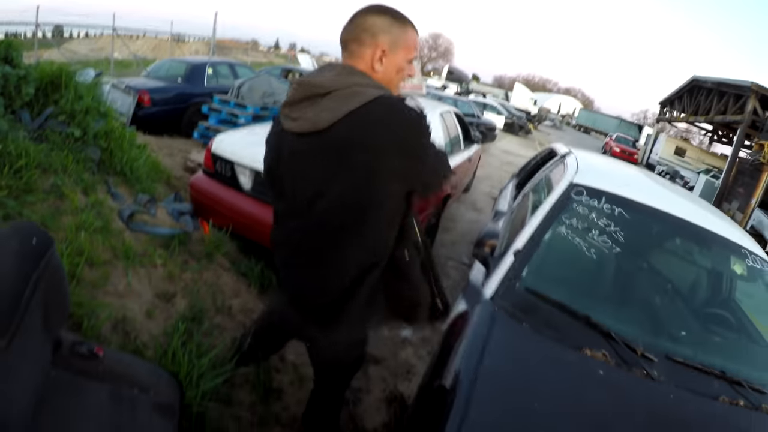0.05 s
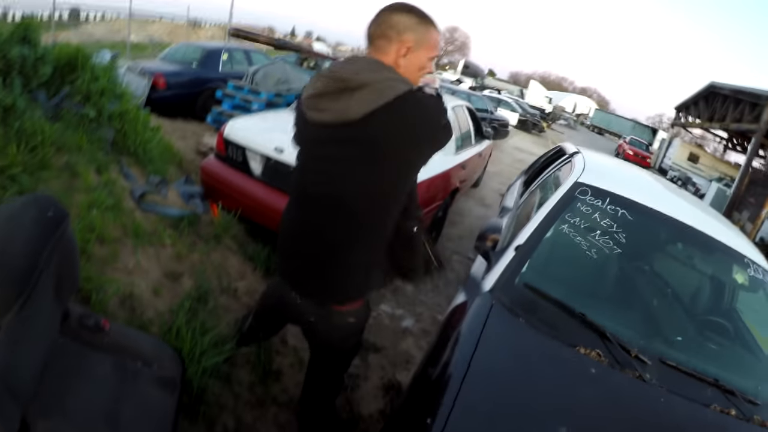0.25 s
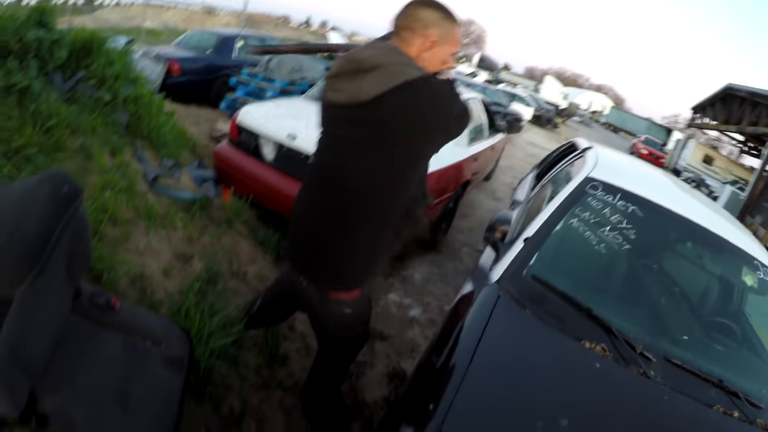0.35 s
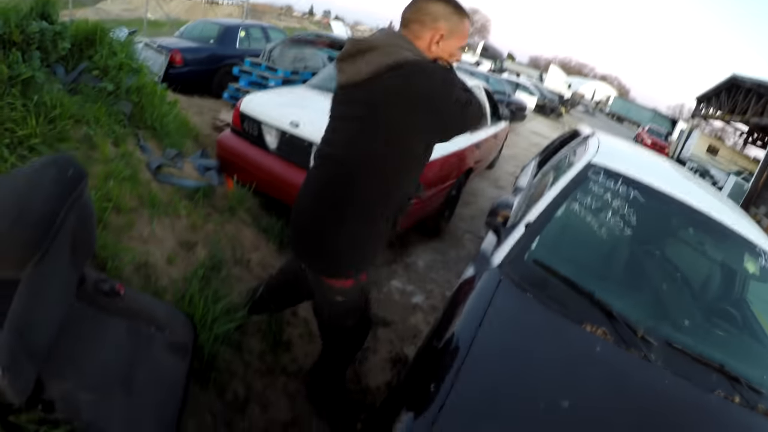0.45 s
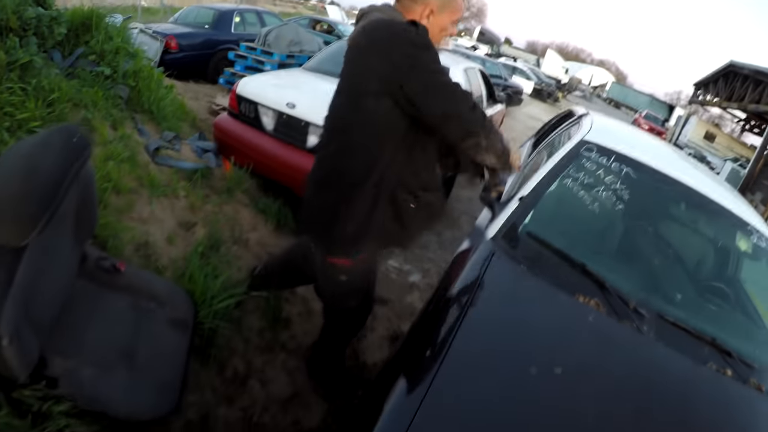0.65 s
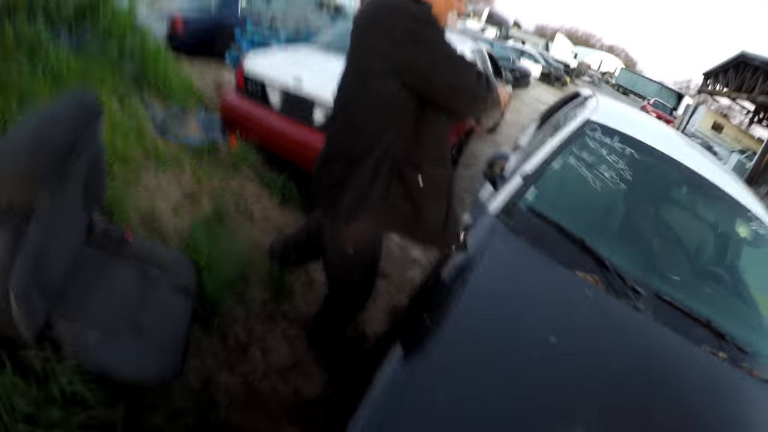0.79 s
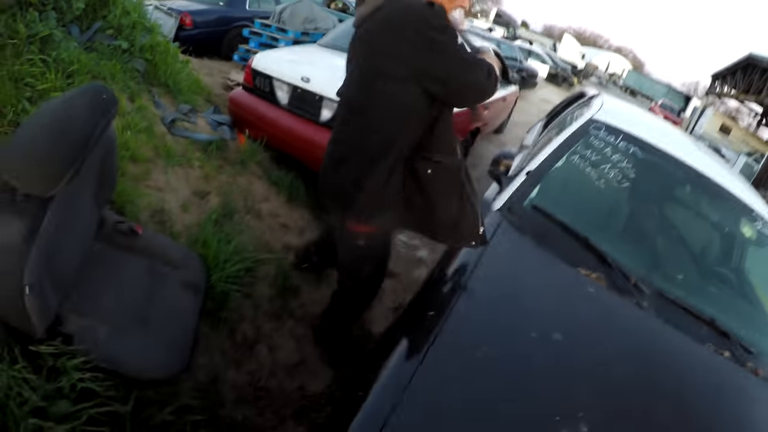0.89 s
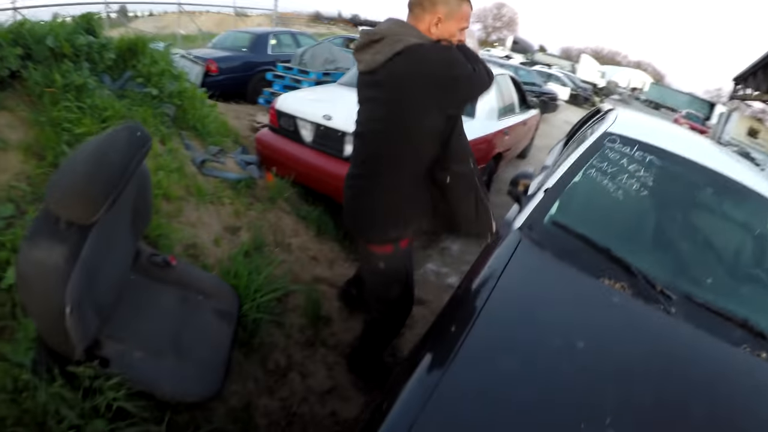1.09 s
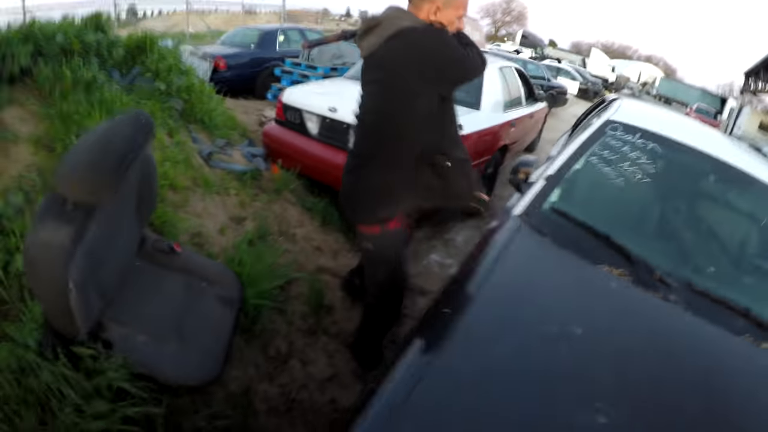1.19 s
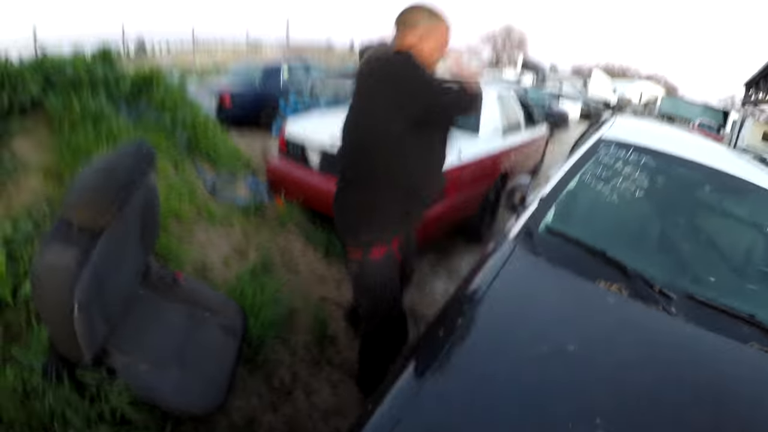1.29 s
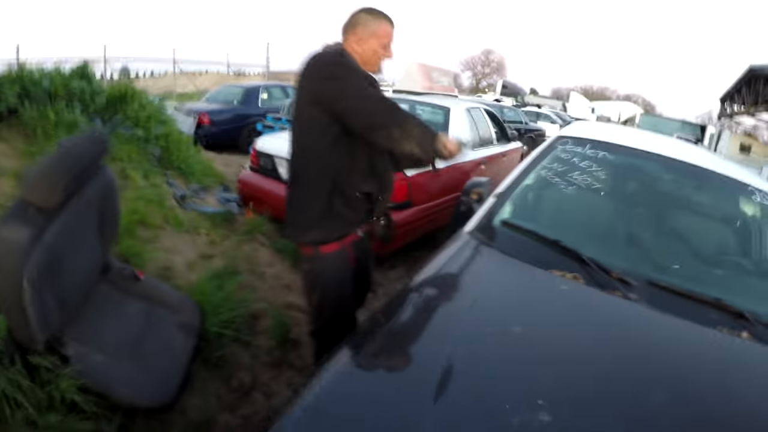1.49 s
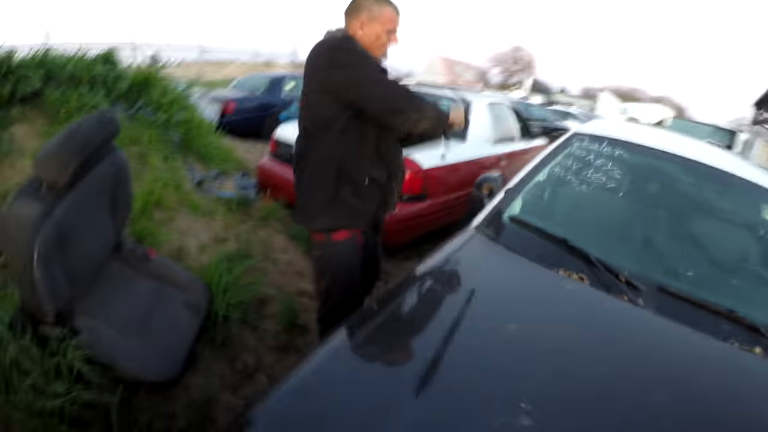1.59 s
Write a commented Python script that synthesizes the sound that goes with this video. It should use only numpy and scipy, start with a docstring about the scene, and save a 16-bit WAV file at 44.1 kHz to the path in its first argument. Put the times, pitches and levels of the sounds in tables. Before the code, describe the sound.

A hard baton strikes a car's side window twice, each sharp crack ringing briefly over a dull door thump. A jacket swishes faintly before each blow, and wind buffets the microphone in an open yard.

```python
"""Baton on a car window

Open yard, a small microphone out in the wind. A hard baton strikes a car's side window twice, the
jacket swishing on each wind-up. The pane cracks and rings briefly, the door thumps, and parked cars
scatter the crack back. Gusts buffet the microphone throughout, and the blows overload it."""
import sys
import numpy as np
from scipy import signal
from scipy.fft import rfft, irfft
from scipy.io import wavfile
from scipy.ndimage import uniform_filter1d

SR = 44100
rng = np.random.default_rng(int(sys.argv[2]) if len(sys.argv) > 2 else 0)


def put_to_file(sound):
    """Save the sound as 16-bit audio at rate SR, in the file named by the first command-line argument."""
    columns = np.atleast_2d(sound).T  # one column per channel
    safe = np.clip(columns, -1, 1)
    whole_steps = np.round(safe * 32767)
    wavfile.write(sys.argv[1], SR, whole_steps.astype(np.int16))


N = 72765

# The two blows. Each row: start in seconds, crack in dB, chatter length in seconds, door thump in dB,
# door pitch factor, cabin boom in dB, tick in dB, tick delay in seconds, echo in dB, door rebound in dB.
BATON_BLOWS = [(0.5668, -10.5, 0.0069, -11.5, .9, -3, -10, 0.0011, -41, -19),
               (1.343, -8.5, 0.0038, -3.5, 1.1, -15, -13, 0.0036, -44.5, -9)]
# Modes of pane, door and cabin air. Each row: frequency in Hz, relative level in dB, T60 in seconds.
PANE_MODES = [(470, -2.5, .05), (711, -8, 0.07), (973, -7.5, .05), (1276, -5.5, 0.051), (2230, -5.5, 0.015),
              (2420, -8.5, 0.027), (2835, -0.5, .045), (3104, -0.5, .045), (3383, 4.5, 0.05),
              (3504, -5, 0.074), (4130, -5.5, 0.045), (4680, -11, 0.038), (5460, -16.5, .05)]
DOOR_MODES = [(121.7, -1.5, 0.096), (152.4, -3, 0.076), (191.6, -6.5, .1), (255.2, -8, 0.061)]
CABIN_MODES = [(57.4, 0.5, 0.1)]
# Dense ring of pane and baton, and the yard's reverberation.
# Each row: band centre in Hz, relative level in dB, T60 in seconds.
CRACK_BANDS = [(325, -8.5, 0.023), (591, -3, .08), (932, -12.5, 0.13), (1458, -8.5, 0.088),
               (2226, -9, 0.051), (2790, 0, 0.077), (4480, -6, 0.091), (5560, -15.5, 0.063),
               (8640, -24.5, 0.1), (13500, -26, 0.063)]
YARD_BANDS = [(1200, -53.5, 0.77), (1970, -51, 0.79), (2700, -51, 0.92), (3850, -52, 0.83),
              (5023, -54.5, 0.49), (7700, -69.5, 1.2), (11500, -74.5, .5)]
# Gusts before, between and after the blows. Each row: time in seconds, rumble in dB, flutter in dB.
GUSTS = [
    [(0.0, -15, -65), (0.038, -29.5, -29.5), (0.1, -35, -100), (0.13, -38, -45.5), (0.154, -38, -55),
     (0.194, -41.5, -63), (0.206, -30.5, -56), (0.22, -26.5, -38), (0.246, -17.5, -37.5), (0.268, -22, -46),
     (0.286, -22, -34.5), (0.332, -30.5, -29), (0.366, -16.5, -21.5), (0.394, -30, -26.5),
     (0.412, -29.5, -24.5), (0.44, -26, -40.5), (0.484, -28.5, -38.5), (0.51, -16.5, -30),
     (0.536, -25, -41.5), (0.552, -10.5, -28.5)],
    [(0.625, -26.5, -35), (0.655, -25.5, -37), (0.693, -39, -44), (0.733, -27, -37), (0.773, -38, -37),
     (0.795, -30.5, -28.5), (0.849, -19.5, -32.5), (0.899, -34.5, -42.5), (0.961, -26.5, -21.5),
     (0.991, -16.5, -37), (1.035, -42, -67), (1.055, -24, -52), (1.073, -33, -59), (1.113, -41, -54),
     (1.155, -26, -42.5), (1.185, -24.5, -60), (1.203, -26.5, -28), (1.277, -15, -44), (1.299, -27, -49),
     (1.318, -44, -40)],
    [(1.4, -23.5, -26.5), (1.424, -32.5, -45), (1.442, -23.5, -31.5), (1.462, -39, -39), (1.484, -16, -45),
     (1.498, -30.5, -31), (1.518, -22.5, -52), (1.536, -31.5, -31), (1.556, -28, -56), (1.574, -42, -52),
     (1.59, -40, -45), (1.604, -31.5, -35), (1.64, -25, -29.5)],
]
# Colour of the wind on the microphone. Each row: band centre in Hz, relative level in dB.
WIND_BANDS = [(22, -5.5), (40, -1), (75, -3.5), (130, -1), (220, -6), (380, -14.5), (650, -27),
              (1100, -42.5), (1800, -53)]
# Eddies hitting the microphone. Each row: time in seconds, peak in dB, width in ms, rough edge in dB.
EDDIES = [(0.035, -25.5, 1.46, -37), (0.218, -25.5, 1.14, -48.5), (0.316, -21.5, 1.4, -40),
          (0.355, -14.5, 1.37, -41), (0.387, -22, 0.72, -39), (0.4, -13.5, 1.76, -31),
          (0.508, -23.5, 1.35, -67), (0.717, -20.5, 1.5, -42), (0.789, -22, 1.37, -41),
          (0.815, -25, 0.67, -36), (0.834, -15, 1.43, -32), (0.86, -26, 0.88, -43),
          (0.885, -28, 1.1, -39.5), (0.926, -22, 0.71, -32), (0.953, -12.5, 2.2, -38),
          (0.957, -11.5, 2.1, -29.5), (0.965, -19, 0.78, -36.5), (0.977, -29, 0.62, -48),
          (1.207, -25, 1.57, -43), (1.236, -27.5, 0.7, -40.5), (1.267, -30, 1.6, -41.5),
          (1.482, -31.5, 0.84, -44.5), (1.52, -22, 1.63, -46.5), (1.607, -24, 1.8, -53),
          (1.632, -28.5, 0.69, -35)]
# Jacket movements. Each row: peak time in seconds, level in dB, rise and fall in seconds.
JACKET_SWISHES = [(0.404, -46.5, 0.034, 0.022), (0.472, -66.5, 0.072, 0.13), (0.918, -65.5, 0.14, 0.14),
                  (1.116, -56, 0.033, 0.063), (1.301, -63.5, 0.057, 0.06)]
# Spectra of rubbing nylon and of the yard's air. Each row: frequency in Hz, relative density in dB.
NYLON_SPECTRUM = [(700, -23), (1400, 1), (2200, -1.5), (4500, -3), (6500, -7), (10000, -13.5), (14000, -18),
                  (15500, -32)]
AIR_SPECTRUM = [(150, -30), (250, -4), (450, -13), (499, -18), (768, -17.5), (2320, -34.5), (2530, -34),
                (10100, -53), (15500, -72.5)]


def window(u, crack_db, chatter_s):
    """The tip chatters on the glass, then pane and baton ring down; u is seconds since contact."""
    snap_db, snap_t60_s, pane_db = 4.5, .0067, -6
    released = np.clip(u - chatter_s, 0, None)  # the crack holds until the chatter ends
    grit = undb(2.5 * walk(600) * fade(released, .03))
    snap = undb(snap_db) * fade(released, snap_t60_s)
    crack = sum(undb(db) * noise_band(hz, .63) * (fade(released, t60) + snap)
                for hz, db, t60 in CRACK_BANDS)
    pane = sum((1 + .5 * walk(120)) * ring(u, [mode]) for mode in PANE_MODES)
    return attack(u) * (undb(crack_db - snap_db) * grit * crack + undb(crack_db + pane_db) * pane)


def tip_tick(u):
    """The hard tip ticks on the glass, high and very short."""
    return fade(u, t60=.004) * noise_band(11000, 1.4)


def door_thump(u, thump_db, pitch, boom_db, rebound_db):
    """The door thumps and rebounds, the cabin booms; the length of the push rounds them off."""
    rebound_s, push_s = .021, .0017
    thump = undb(thump_db) * ring(u - .002, DOOR_MODES, pitch)
    boom = undb(boom_db) * ring(u - .001, CABIN_MODES)
    rebound = undb(rebound_db) * ring(u - rebound_s, DOOR_MODES, pitch)
    return uniform_filter1d(thump + boom + rebound, int(push_s * SR))


def yard_reflections(u, echo_db):
    """Parked cars scatter the crack back: a diffuse tail and one short echo from farther off."""
    echo_s = .101
    tail = sum(undb(db + 1.3 * walk(30)) * steep_band(hz, .6) * fade(u, t60)
               for hz, db, t60 in YARD_BANDS)
    echo = uniform_filter1d(fade(u - echo_s, t60=.04), size=150) * steep_band(3200, .625)
    return attack(u) * tail + undb(echo_db) * echo


def baton_blows(t):
    """Each blow sets off glass and door, and the yard answers."""
    out = np.zeros(N)
    for blow in BATON_BLOWS:
        at, crack_db, chatter_s, thump_db, pitch, boom_db, tick_db, tick_s, echo_db, rebound_db = blow
        u = t - at
        out += window(u, crack_db, chatter_s)
        out += undb(tick_db) * tip_tick(u - tick_s)
        out += door_thump(u, thump_db, pitch, boom_db, rebound_db)
        out += yard_reflections(u, echo_db)
    return out


def wind_buffet(t):
    """Turbulence right on the microphone: the deep bands roll, the upper ones flutter together."""
    split_hz = 119.7
    times, rumble, flutter = np.concatenate(GUSTS).T
    rumble_db, flutter_db = np.interp(t, times, rumble), np.interp(t, times, flutter)
    flicker = walk(47)
    out = np.zeros(N)
    for hz, db in WIND_BANDS:
        upper = np.clip(np.log2(hz / split_hz) + .5, 0, 1)  # rumble gives way to flutter over an octave
        gust_db = (1 - upper) * rumble_db + upper * flutter_db
        flicker_db = -(.155 * upper + .25 * max(np.log2(hz / 200), 0)) * flicker
        out += undb(db + gust_db + flicker_db + 1.7 * walk(15)) * steep_band(hz, 1.09)
    return out


def eddy_pops(t):
    """Each eddy pops on the microphone: one pressure pulse with a short rough edge."""
    lag_s, edge_s = .003, .0018
    edge = steep_band(555, 1.5)
    out = np.zeros(N)
    for at, db, width_ms, edge_db in EDDIES:
        u = (t - at - lag_s) * 1000 / width_ms
        out += undb(db) * (1 - u ** 2) * np.exp(-u ** 2 / 2)
        out += undb(edge_db) * np.exp(-((t - at - edge_s) / edge_s) ** 2) * edge
    return out


def jacket(t):
    """Nylon rubs on nylon: a grainy hiss that swells and stops."""
    swell = sum(undb(db) * np.exp(-((t - at) / np.where(t < at, rise, fall)) ** 2)
                for at, db, rise, fall in JACKET_SWISHES)
    grain = undb(1.2 * walk(370))
    return swell * grain * coloured(NYLON_SPECTRUM)


def yard_air(level_db=-58.5):
    """A faint, slowly drifting hush behind everything."""
    return undb(level_db + 2.7 * walk(2.7)) * coloured(AIR_SPECTRUM)


def undb(db):
    return 10 ** (np.asarray(db) / 20)


def unit(x):
    return x / np.sqrt(np.mean(x ** 2))


def band(x, hz, octaves):
    """Band-pass centred on hz."""
    edges = np.clip([hz * 2 ** (-octaves / 2), hz * 2 ** (octaves / 2)], 5, .45 * SR)
    return signal.sosfilt(signal.butter(2, edges, "bandpass", fs=SR, output="sos"), x)


def noise_band(hz, octaves):
    """Band of noise, rms 1."""
    return unit(band(rng.standard_normal(N), hz, octaves))


def steep_band(hz, octaves):
    """Band of noise filtered twice, rms 1."""
    return unit(band(noise_band(hz, octaves), hz, octaves))


def coloured(spectrum):
    """Noise of rms 1 with the given spectrum."""
    hz, db = np.array(spectrum).T
    bins_hz = np.arange(N // 2 + 1) * SR / N + 1
    gain = undb(np.interp(np.log(bins_hz), np.log(hz), db, left=-90))
    return unit(irfft(rfft(rng.standard_normal(N)) * gain, N))


def walk(rate):
    """Random levels held 1 / rate seconds and slewed twice."""
    hold = int(SR / rate)
    steps = np.repeat(rng.standard_normal(N // hold + 1), hold)
    return 1.52 * uniform_filter1d(uniform_filter1d(steps, hold), hold)[:N]


def attack(t, rise_s=.0007):
    """Linear rise from the moment of contact."""
    return np.clip(t / rise_s, 0, 1)


def fade(t, t60):
    """Silent before t = 0, then falling 60 dB in t60 seconds."""
    return (t >= 0) * np.exp(-np.log(1000) * np.clip(t, 0, None) / t60)


def ring(t, modes, pitch=1):
    """Sum of decaying sines."""
    return sum(undb(db) * fade(t, t60) * np.sin(2 * np.pi * hz * pitch * t) for hz, db, t60 in modes)


def scene():
    """Everything that reaches the one microphone."""
    t = np.arange(N) / SR
    return (yard_air() + eddy_pops(t) + wind_buffet(t) + baton_blows(t) + jacket(t))[None]


def record(dry):
    """The microphone overloads: the loudest peaks flatten against full scale; the top is cut."""
    drive, top_hz = 1.156, 15600
    driven = drive * dry
    clipped = driven / (1 + np.abs(driven) ** 6) ** (1 / 6)
    return signal.sosfilt(signal.ellip(10, .2, 75, top_hz, fs=SR, output="sos"), clipped)


dry = scene()
out = record(dry)
put_to_file(out)
```